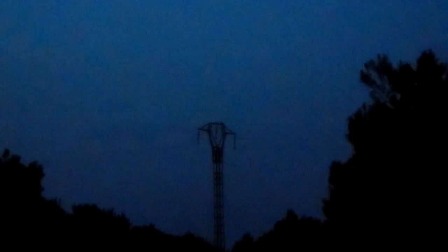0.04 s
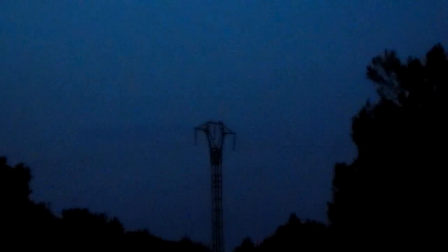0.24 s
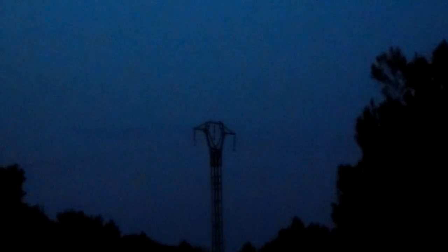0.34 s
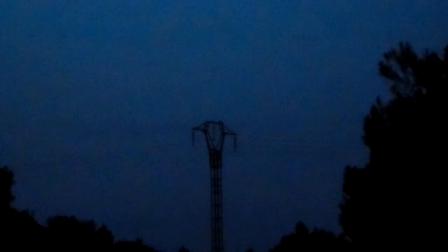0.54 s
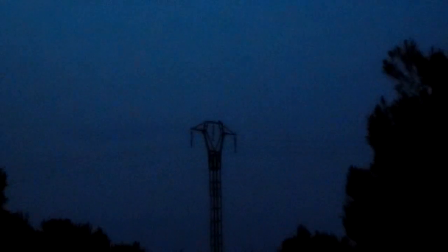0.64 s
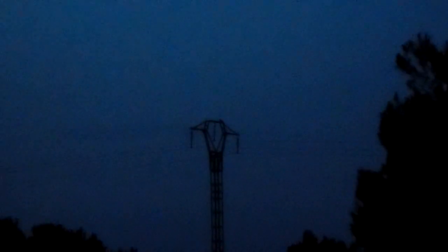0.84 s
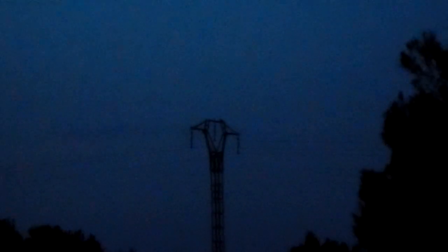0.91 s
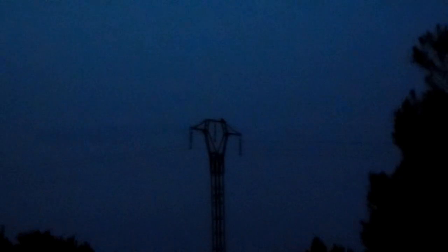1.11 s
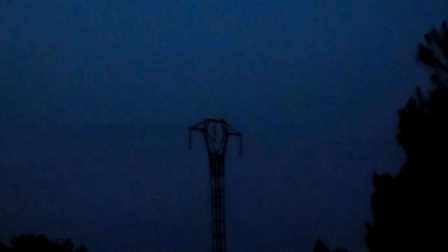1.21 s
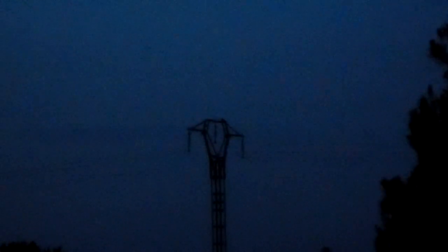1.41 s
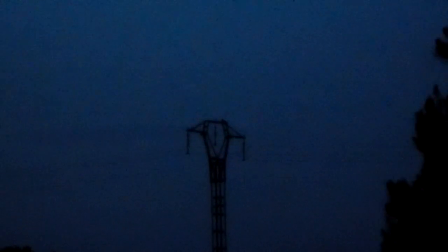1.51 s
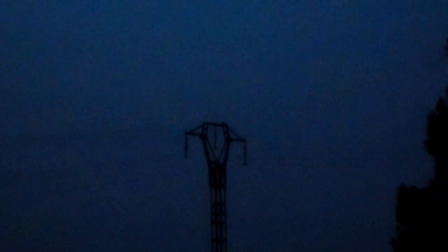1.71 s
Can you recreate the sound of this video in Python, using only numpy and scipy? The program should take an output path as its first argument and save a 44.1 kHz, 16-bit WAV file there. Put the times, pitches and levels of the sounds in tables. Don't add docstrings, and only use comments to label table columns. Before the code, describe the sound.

Low wind thumps on a microphone over steady motor whir, then faint paired bird notes far off

```python
import sys
import numpy as np
from scipy import signal
from scipy.fft import rfft, irfft
from scipy.io import wavfile
from scipy.ndimage import uniform_filter1d

SR = 44100
rng = np.random.default_rng(int(sys.argv[2]) if len(sys.argv) > 2 else 0)


def generate_wav(sig):
    pcm = np.round(np.clip(np.atleast_2d(sig).T, -1, 1) * 32767).astype(np.int16)
    wavfile.write(sys.argv[1], SR, pcm)


def field_ratio(decibels):
    return 10 ** (np.asarray(decibels, dtype=float) / 20)


N = 77175

# t/s, level/dB
GUSTS = [(0.0, -39), (0.146, -63.5), (0.262, -28), (0.346, -38.5), (0.428, -26), (0.492, -40), (0.652, -42),
         (0.676, -33.5), (0.736, -47.5), (0.92, -55.5), (0.998, -43), (1.022, -50.5), (1.11, -38.5),
         (1.232, -50.5), (1.54, -42.5), (1.622, -48.5), (1.706, -58), (1.75, -46)]
# f/Hz, level per Hz/dB
WIND_COLOUR = [(25, 2), (60, -4), (120, -5), (250, -28.5), (500, -57), (1000, -75)]
# t/s, peak level/dB, f/Hz
EDDY_BURSTS = [(0.014, -40.5, 53.6), (0.056, -40, 83), (0.204, -37, 63.4), (.256, -26.5, 70),
               (0.273, -23.5, 83), (.297, -27, 106), (0.329, -30.5, 73.5), (0.365, -31.5, 98),
               (.396, -33, 100), (.415, -18.5, 150), (.441, -24.5, 71), (0.471, -39, 95), (0.526, -35, 62),
               (0.56, -33, 93.5), (0.603, -36, 50.3), (0.668, -36, 56.5), (.686, -28, 53),
               (.802, -42.5, 64.5), (1.001, -32.5, 52), (1.045, -38.5, 52.4), (1.084, -31.5, 52.6),
               (1.113, -28.5, 75.6), (1.143, -38.5, 92), (1.182, -41.5, 60), (1.307, -39.5, 44.8),
               (1.358, -44, 60), (1.438, -43.5, 49), (1.477, -39.5, 46.3), (1.519, -37, 57.5),
               (1.699, -40.5, 47.6)]
# t/s, peak level/dB
MEMBRANE_SNAPS = [(.250, -44), (0.272, -49), (0.302, -33.5), (0.366, -49), (0.414, -25), (.441, -50.5),
                  (.558, -47.5), (0.57, -44.5), (0.676, -57), (0.693, -55), (1.116, -66), (1.150, -52.5),
                  (1.190, -70), (1.358, -58), (1.521, -53), (1.543, -49)]
# t/s, turn rate/Hz
MOTOR_SPEED = [
    (0, 32.66),
    (.8, 32.76),
    (1.75, 32.98),
]
# t/s, extra brightness/dB, extra whine/dB
MOTOR_LOAD = [
    (0, -0.4, 1.5),
    (.8, 0.4, 1),
    (1.45, -1, 2),
    (1.6, 2.5, 1.5),
    (1.75, 1, 4),
]
# times a turn, depth in casing/dB, depth in barrel/dB, phase/rad
MOTOR_THROB = [(5, 3.0, 1.5, .3), (10, 1.0, .9, .7), (2, 1.3, 1.3, 1.3), (4, 2.0, .7, 2.1), (3, .7, .7, .4)]
# f/Hz, width/Hz, level/dB
CASING_MODES = [(624, 263, -13), (1308, 45, -7.5), (1522, 44, -6.5), (1649, 116, -5), (2455, 79, -7.5),
                (2812, 290, -4), (3134, 278, -5), (3608, 238, -8.5), (4170, 183, -14.5)]
# f/Hz, width/Hz, level/dB
BARREL_MODES = [(5210, 300, -15.5), (5730, 550, -15.5), (6470, 710, -16.5), (7280, 650, -14),
                (7960, 810, -14.5), (8890, 610, -11), (9640, 330, -12.5), (9890, 370, -12.5),
                (10630, 690, -16.5), (11960, 330, -19.5)]
WHINE_TONES = [(1, 1), (1, 2), (2, -3), (2, -2), (2, 0), (2, 3), (3, -1), (3, 0), (3, 1), (3, 2), (4, -2),
               (5, 1), (6, -1)]
WHINE_LEVELS = [-82, -79, -71.5, -70.5, -82, -79, -68, -72, -73, -76, -79, -87, -86]
# f/Hz, level per Hz/dB
HISS_COLOUR = [(100, 1.5), (400, 2.5), (1000, 2.3), (2200, -4), (4750, -11.5), (8000, -8.5), (11200, -12.5),
               (13000, -8)]
# t/s, top pitch f/Hz, level/dB, tail level/dB, fall time/s
BIRD_NOTES = [
    (1.035, 1440, -46, -16, .008),
    (1.140, 1490, -46, -11, .011),
    (1.330, 1510, -47.5, -8, .011),
    (1.434, 1505, -45.5, -11, .0055),
    (1.642, 1545, -51.5, -3, .009),
    (1.743, 1560, -52.5, -4, .007),
]


def rms_one(x):
    return x / np.sqrt(np.mean(x ** 2) + 1e-20)


def in_time(rows):
    s, *columns = np.transpose(rows)
    return [np.interp(np.arange(N) / SR, s, c) for c in columns]


def at_hz(points, hz):
    points_hz, points_db = np.transpose(points)
    return np.interp(np.log(hz), np.log(points_hz), points_db)


def drift(rate_hz):
    r = np.exp(-2 * np.pi * rate_hz / SR)
    white = rng.standard_normal(N + SR)
    return rms_one(signal.lfilter([1], [1, -2 * r, r * r], white)[SR:])


def resonance(x, hz, width_hz):
    r = np.exp(-np.pi * 1.5 * width_hz / SR)
    b = (1 - r * r) / 2 * np.array([1, 0, -1])
    a = [1, -2 * r * np.cos(2 * np.pi * hz / SR), r * r]
    return signal.lfilter(b, a, signal.lfilter(b, a, x))


def evened(x):
    window, share = int(.013 * SR), .85
    slow = uniform_filter1d(uniform_filter1d(x ** 2, window), window)
    return x * (np.mean(slow) / (slow + 1e-12)) ** (share / 2)


def buffet():
    gust_db, = in_time(GUSTS)
    swing_db = gust_db - gust_db.mean()
    shared_lumps = drift(10.7)
    edges_hz = 16 * 2 ** np.arange(0, 6.1, .5)
    out = 0
    for low, high in zip(edges_hz, edges_hz[1:]):
        sos = signal.butter(2, [low, high], "band", fs=SR, output="sos")
        band = signal.sosfilt(sos, rng.standard_normal(N + SR))[SR:]
        hz = np.sqrt(low * high)
        reach = 0.26 * max(np.log2(hz / 60), 0)
        lumps_db = 0.5 * (0.65 * shared_lumps + .5 * drift(29.0))
        out = out + band * field_ratio(at_hz(WIND_COLOUR, hz) + reach * swing_db + lumps_db)
    return field_ratio(gust_db - 6.5) * rms_one(out)


def eddies():
    eddy_cycles, snap_s = 0.31, 0.0048
    out, t = np.zeros(N + SR), np.arange(-2500, 2500) / SR
    for (s, db, hz), phase in zip(EDDY_BURSTS, rng.random(len(EDDY_BURSTS))):
        swell = np.exp(-.5 * (t * hz / eddy_cycles) ** 2)
        out[int(s * SR):][:5000] += field_ratio(db) * swell * np.cos(2 * np.pi * (hz * t + phase))
    band = signal.butter(2, [172, 306.6], "band", fs=SR, output="sos")
    dull = signal.butter(2, 730, fs=SR, output="sos")
    shape = np.exp(-.5 * (t / snap_s) ** 2)
    for (s, db), white in zip(MEMBRANE_SNAPS, rng.standard_normal((len(MEMBRANE_SNAPS), 5000))):
        flutter = signal.sosfilt(band, white)
        flutter = flutter / np.abs(signal.hilbert(flutter)) ** 0.45
        flutter = signal.sosfiltfilt(dull, flutter * shape)
        out[int(s * SR):][:5000] += field_ratio(db) * flutter / np.abs(flutter).max()
    return out[2500:2500 + N]


def whir(turn, bright_db):
    grit_per_s, grit_hz, grit_octaves = 260, 9000, 0.19
    uneven_db = .7 * drift(90.0)
    casing = field_ratio(sum(db * np.cos(k * turn + p) for k, db, _, p in MOTOR_THROB) + uneven_db)
    barrel = field_ratio(sum(db * np.cos(k * turn + p) for k, _, db, p in MOTOR_THROB) + uneven_db)
    friction = rng.standard_normal((2, N))
    chance = grit_per_s / SR * (1 + np.cos(5 * turn)) ** 2 / 1.5
    grit = field_ratio(15) * rng.standard_normal(N) * (rng.random(N) < chance)
    out = np.zeros(N)
    for k, (hz, width_hz, db) in enumerate(CASING_MODES):
        out += field_ratio(db) * evened(resonance(casing * friction[k % 2], hz, width_hz))
    for k, (hz, width_hz, db) in enumerate(BARREL_MODES):
        loose = np.exp(-.5 * (np.log2(hz / grit_hz) / grit_octaves) ** 2)
        rub = barrel * (friction[k % 2] + loose * grit)
        out += field_ratio(db + loose * bright_db) * resonance(rub, hz, width_hz)
    return field_ratio(-37.5) * out


def whine(turn):
    drive = 2 * np.pi * 1000 * np.arange(N) / SR
    out = np.zeros(N)
    for (m, k), db in zip(WHINE_TONES, WHINE_LEVELS):
        flicker_db = -1.5 * drift(7.7)
        out += field_ratio(db + flicker_db) * np.sqrt(2) * np.sin(m * drive + 5 * k * turn)
    return out


def motor():
    turns_per_s, = in_time(MOTOR_SPEED)
    bright_db, whine_db = in_time(MOTOR_LOAD)
    wobble_turns = .012 * drift(2.0)
    turn = 2 * np.pi * (np.cumsum(turns_per_s) / SR + wobble_turns)
    return whir(turn, bright_db) + field_ratio(whine_db) * whine(turn)


def hiss():
    hz = np.maximum(np.arange(N // 2 + 1) * SR / N, 20)
    top = field_ratio(-62) * resonance(rng.standard_normal(N), 14300, 700)
    coloured = irfft(rfft(rng.standard_normal(N)) * field_ratio(at_hz(HISS_COLOUR, hz)), N)
    return top + field_ratio(-61.5) * rms_one(coloured)


def bird():
    head_s, sag_hz_per_s, end_hz, fall_delay_s = .0042, 9000, 780, .004
    tail_falls, echo_s, echo_db = 2.1, .035, -19
    out, t = np.zeros(N + SR), np.arange(-1000, 3000) / SR
    late = np.maximum(t - fall_delay_s, 0)
    for s, top_hz, db, tail_db, fall_s in BIRD_NOTES:
        sagging_hz = top_hz - sag_hz_per_s * np.minimum(t, fall_delay_s)
        hz = end_hz + (sagging_hz - end_hz) * np.exp(-late / fall_s)
        head = np.exp(-.5 * (t / head_s) ** 2)
        tail = (t > 0) * np.tanh(t / head_s) * np.exp(-(np.abs(t) / (tail_falls * fall_s)) ** 4)
        shape = head + field_ratio(tail_db) * tail
        i = int(s * SR) - 1000
        out[i:i + len(t)] += field_ratio(db) * shape * np.sin(2 * np.pi * np.cumsum(hz) / SR)
    scatter = rng.standard_normal(6000) * np.exp(-np.arange(6000) / SR / echo_s)
    echo = signal.fftconvolve(out, scatter / np.sqrt(np.sum(scatter ** 2)))
    return out[:N] + field_ratio(echo_db) * echo[:N]


def scene():
    return (buffet() + eddies() + motor() + hiss() + bird())[None]


def low_pass(x):
    return signal.sosfilt(signal.butter(12, 14140, fs=SR, output="sos"), x)


def record(dry):
    return low_pass(dry)


dry = scene()
out = record(dry)
generate_wav(out)
```